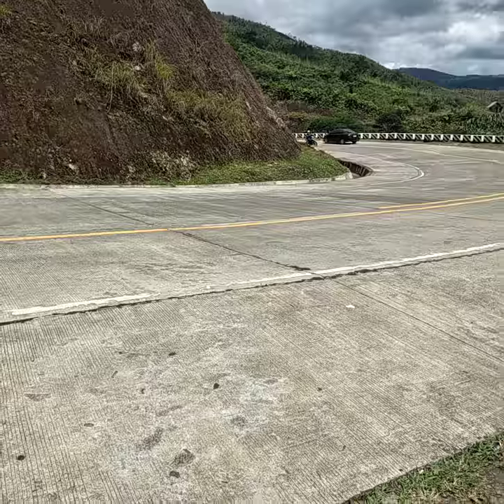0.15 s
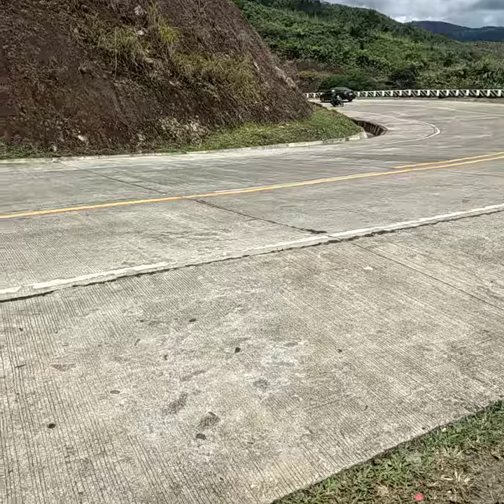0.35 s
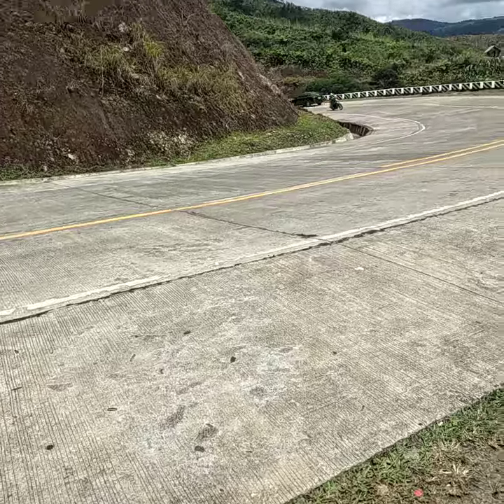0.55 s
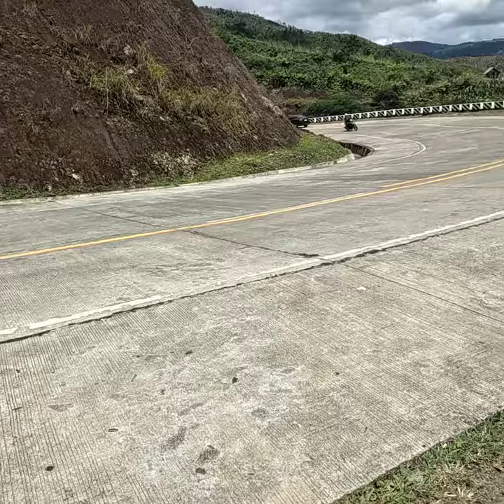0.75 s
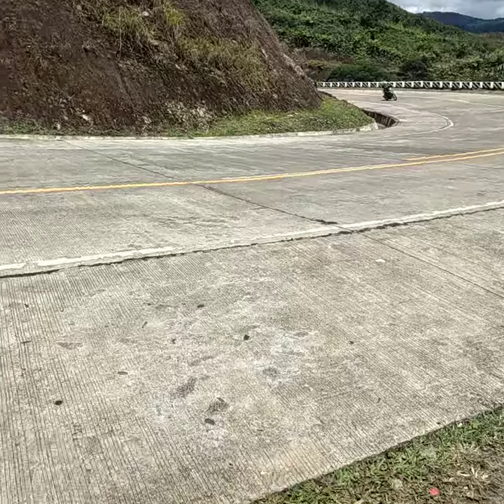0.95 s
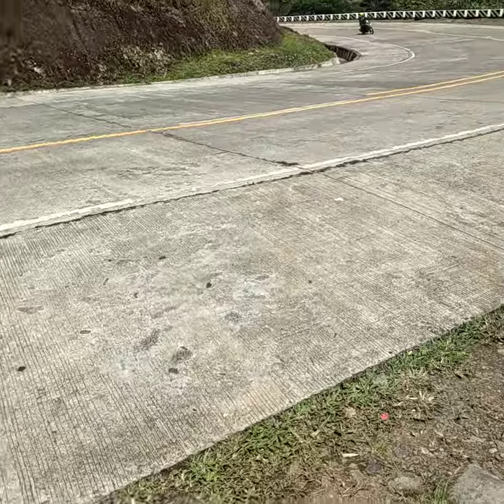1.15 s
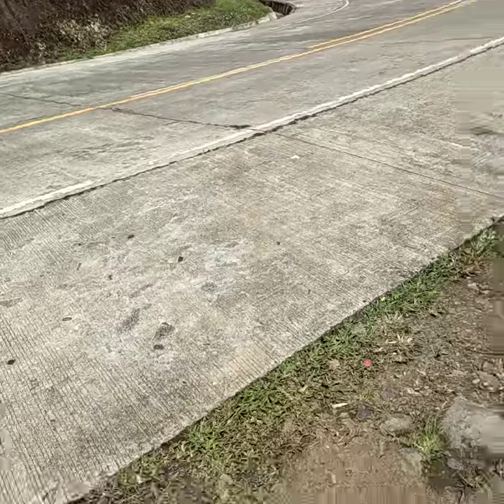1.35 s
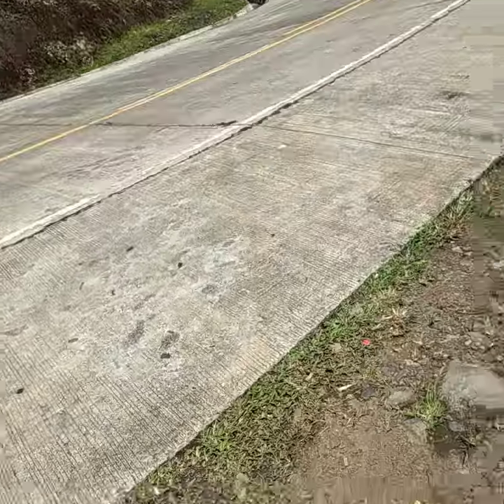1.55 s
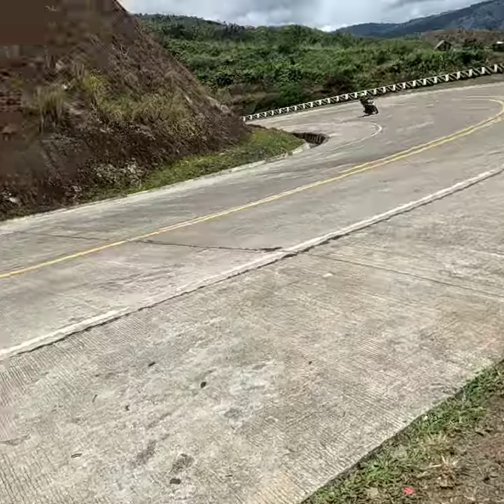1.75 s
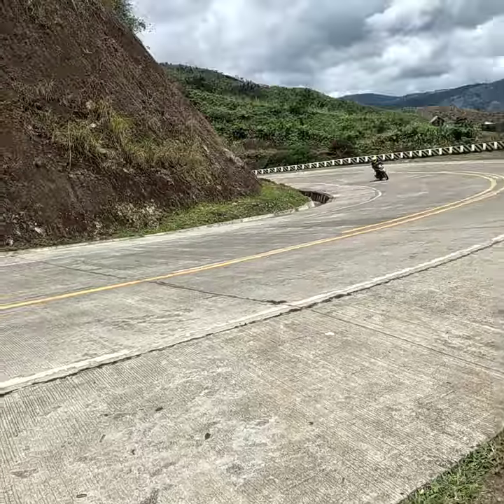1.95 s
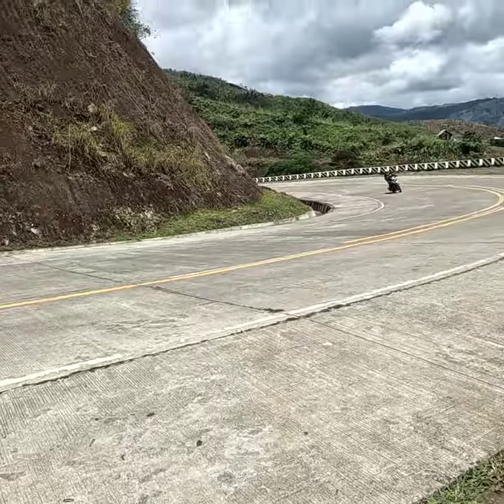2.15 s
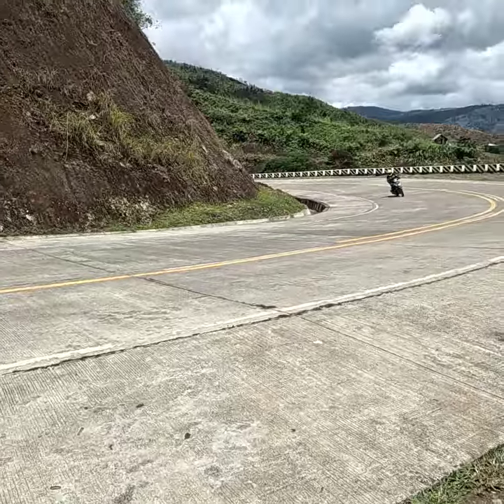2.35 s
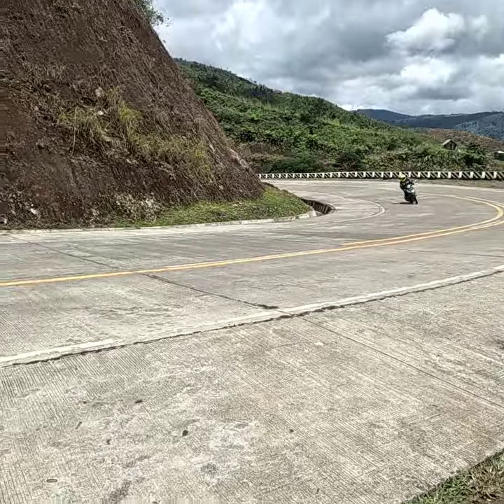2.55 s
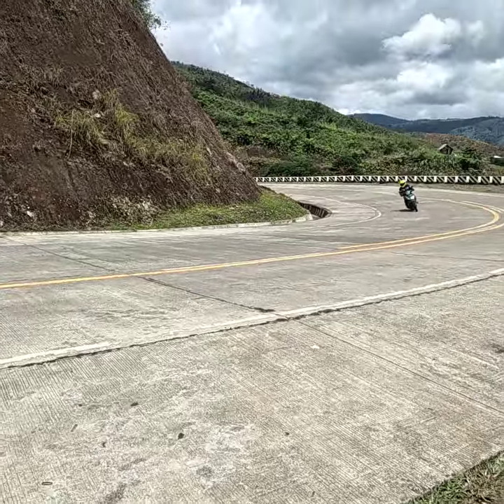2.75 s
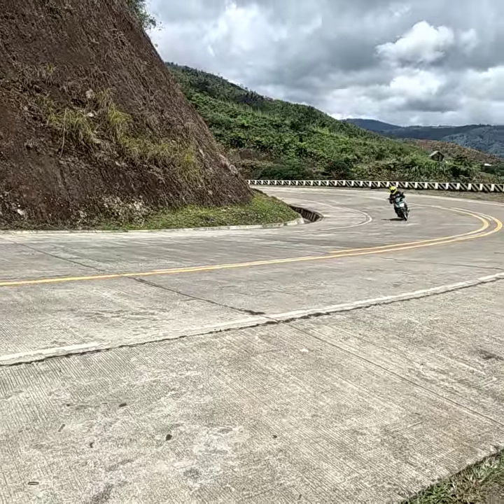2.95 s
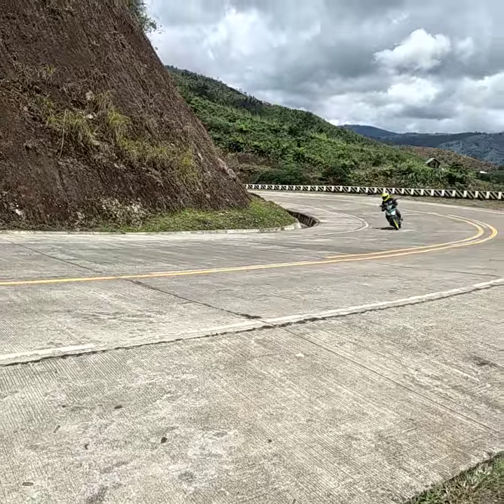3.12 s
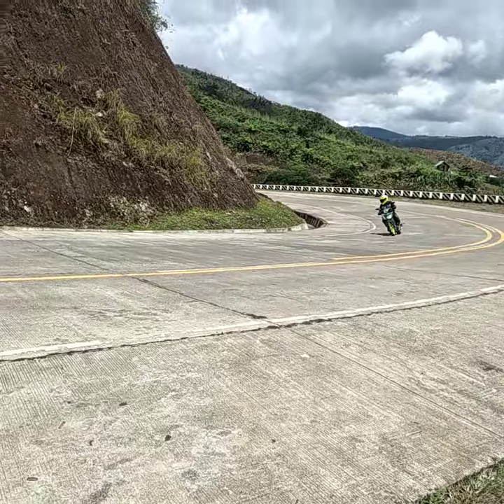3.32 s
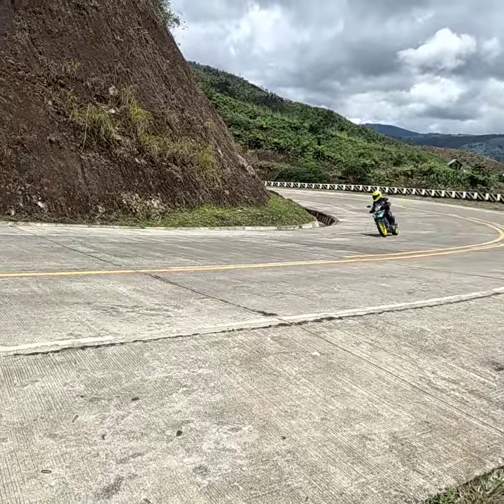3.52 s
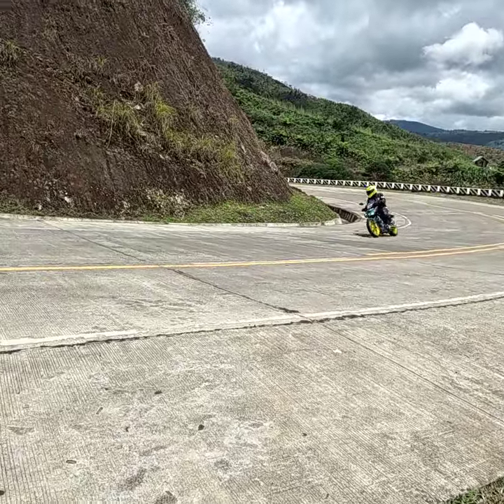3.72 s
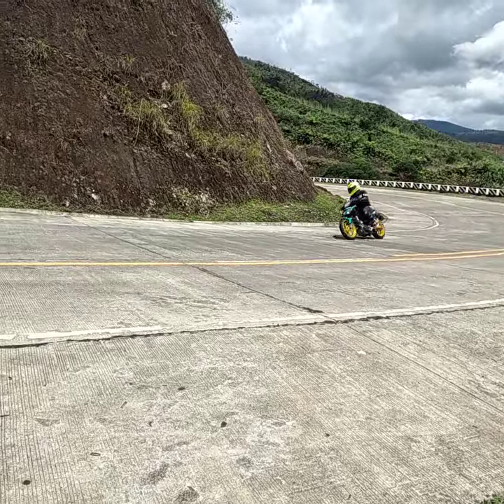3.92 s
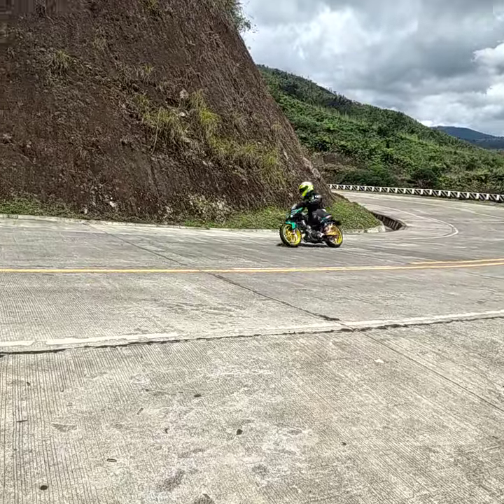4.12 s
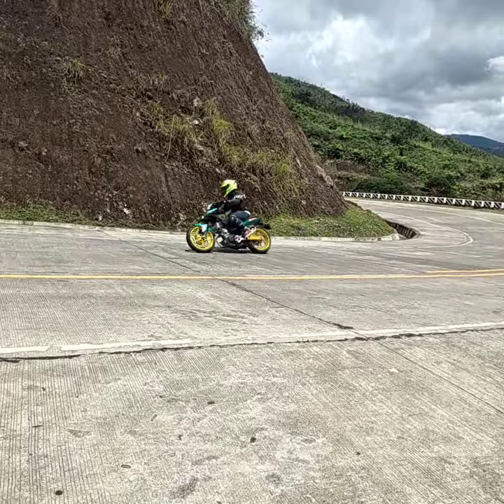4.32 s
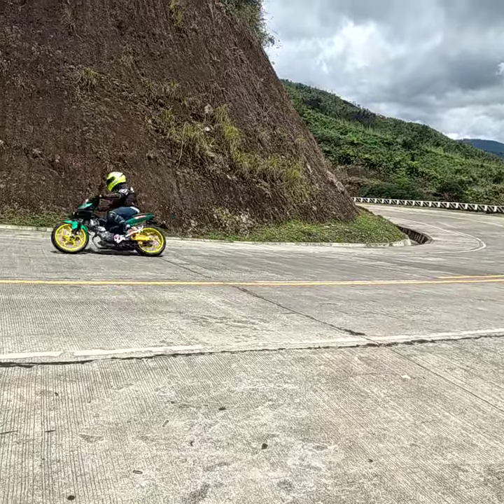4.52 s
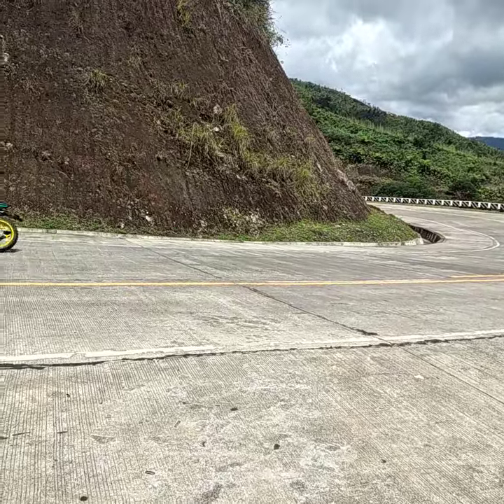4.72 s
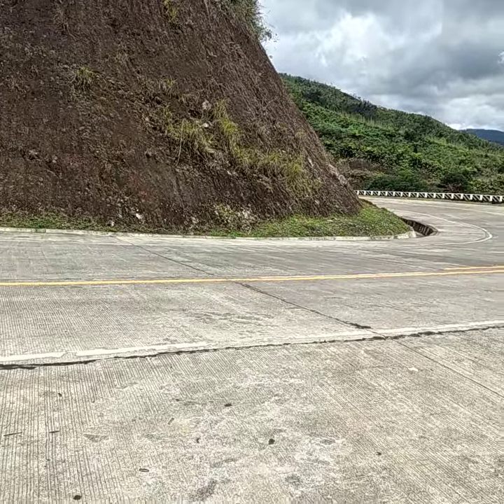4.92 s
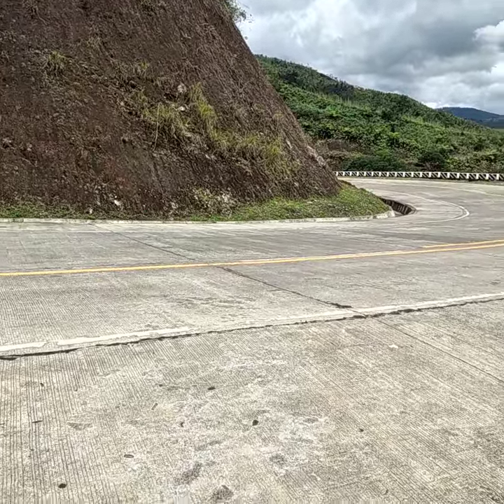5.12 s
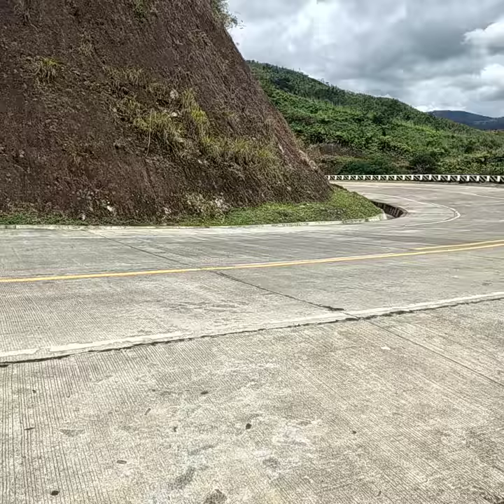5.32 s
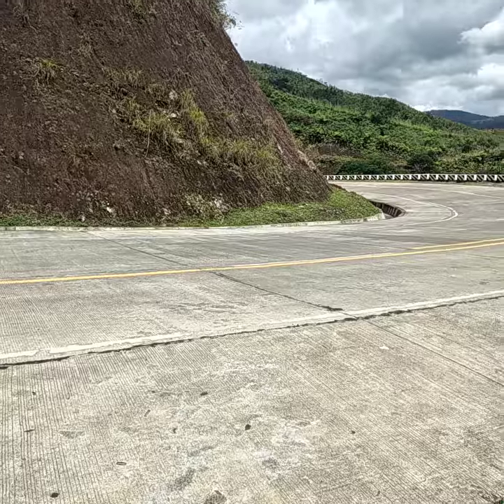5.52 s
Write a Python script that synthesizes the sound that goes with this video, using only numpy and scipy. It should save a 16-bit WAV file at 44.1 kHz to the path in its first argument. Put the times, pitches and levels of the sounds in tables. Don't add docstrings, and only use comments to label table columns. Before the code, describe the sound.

After about a third of a second of silence, a one-cylinder scooter fades in, its fast exhaust crackling sharply as it pulls away. A slow dull idle beats underneath with a soft wash off the hillside. A second scooter grows from a faint hum, opens its throttle and thumps past near five seconds, tyres hissing, chain rattling. Outdoors, handheld stereo microphone.

```python
import sys
import numpy as np
from scipy import signal
from scipy.fft import rfft, irfft, next_fast_len
from scipy.io import wavfile
from scipy.ndimage import uniform_filter1d

SR = 44100
rng = np.random.default_rng(int(sys.argv[2]) if len(sys.argv) > 2 else 0)


def ratio_of_db(decibels):
    return 10 ** (np.asarray(decibels, float) / 20)


def store_wav(level_fs):
    pcm = np.round(np.clip(np.atleast_2d(level_fs), -1, 1) * 32767)
    wavfile.write(sys.argv[1], SR, pcm.T.astype(np.int16))


N = 245637
T = np.arange(N) / SR
SOUND_CM_PER_S = 34300


def evened(x):
    return x / np.sqrt(np.mean(x ** 2) + 1e-20)


def between(ends, share):
    return ends[0] + (ends[1] - ends[0]) * share


def read(points, hz):
    f, value = np.transpose(points)
    return np.interp(np.log(hz + 1), np.log(f + 1), value)


def curves(rows):
    s, *columns = np.transpose(rows)
    return [np.interp(T, s, c) for c in columns]


def later(x, delay_ms):
    return np.interp(T - delay_ms / 1000, T, x)


def causal(points, size=8192):
    hz = abs(np.fft.fftfreq(size, 1 / SR))
    log_gain = np.log(ratio_of_db(np.maximum(read(points, hz), -100)))
    return np.fft.ifft(np.exp(np.conj(signal.hilbert(log_gain)))).real[:size // 2]


def resonate(x, hz, width):
    turn = np.exp(2j * np.pi * np.cumsum(hz * np.ones(N)) / SR)
    r = np.exp(-np.pi * width / SR)
    return 2 * (turn * signal.lfilter([1 - r], [1, -r], x / turn)).real


def firings(rate, at, jitter_ms):
    turns = np.cumsum(curves(rate)[0]) / SR - at
    places = np.flatnonzero(np.diff(np.floor(turns)) > 0)
    places = places + jitter_ms / 1000 * SR * rng.standard_normal(len(places))
    return np.clip(places, 0, N - 1).astype(int)


def blows(places, spread_db):
    train = np.zeros(N)
    luck = np.clip(rng.standard_normal(len(places)), -1.7, 1.7)
    train[np.minimum(places, N - 1)] = ratio_of_db(spread_db * luck)
    return train


def gate(places, depth, decay_ms, spread_db):
    decay = np.exp(-np.arange(1500) / SR * 1000 / decay_ms)
    puffs = signal.oaconvolve(blows(places, spread_db), decay)[:N]
    return evened(1 + depth * puffs)


def crack(places, pipe, lag_ms, tail_ms, tail_db, spread_db):
    t, out = np.arange(1200) / SR, np.zeros(N)
    train = blows(np.minimum(places + int(lag_ms / 1000 * SR), N - 1), spread_db)
    tail = ratio_of_db(tail_db) * np.exp(-t * 1000 / tail_ms)
    for hz, width, db in pipe:
        puff = signal.oaconvolve(train, tail)[:N] * rng.standard_normal(N)
        ring = ratio_of_db(db) * width / 170 * np.exp(-np.pi * width * t) * np.sin(2 * np.pi * hz * t)
        ring *= 1 - np.exp(-t / .0005)
        out -= signal.oaconvolve(train + puff, ring)[:N]
    return evened(out)


def thump(train, colour, share, delay_ms, pipe_share, pipe_ms, bark_db, bark_ms, bark_hz):
    push = signal.oaconvolve(train, causal(colour))[:N]
    size = next_fast_len(N)
    lag_s = .0011 / (1 + (420 / (np.fft.rfftfreq(size, 1 / SR) + 1)) ** 4)
    push = irfft(rfft(push, size) * np.exp(-2j * np.pi * np.cumsum(lag_s) * SR / size), size)[:N]
    low = signal.filtfilt(*signal.butter(3, 480, fs=SR), push)
    high = push - low
    bark = 0.36 * high + resonate(high, bark_hz, 176) + 0.23 * resonate(high, 780, 170)
    bark = ratio_of_db(bark_db) * (bark + 0.43 * later(bark, bark_ms))
    again = later(uniform_filter1d(low, size=70), pipe_ms)
    return (low + share * later(low, delay_ms) + pipe_share * again + bark) / np.std(low)


def pair(hz, tilt, turn):
    return ratio_of_db(read(tilt, hz) / 2) * np.exp(.5j * np.interp(hz, *np.transpose(turn)))


def ports(x, tilt, turn):
    size = next_fast_len(N)
    half = pair(np.fft.rfftfreq(size, 1 / SR), tilt, turn)
    return irfft(rfft(x, size) * np.array([half, 1 / half]), size)[:, :N]


# (f/Hz, likeness [0-1])
LIKENESS = [(30, .9), (120, .94), (250, .9), (490, .65), (1000, .72), (2000, .66), (4000, .58), (8000, .36),
            (13000, .18)]


def noise(colour, tilt, turn, patchy_db, mirror):
    frames, hz = N // 128 + 5, np.fft.rfftfreq(512, 1 / SR)
    a, b, c, d, patches = rng.standard_normal((frames, 257, 5)).T
    patches = evened(uniform_filter1d(uniform_filter1d(patches, size=8, axis=0), size=20, axis=1))
    same = np.clip(read(LIKENESS, hz), 0, 1)[:, None]
    left = a + 1j * b
    right = same * left + np.sqrt(1 - same ** 2) * (c + 1j * d)
    half = pair(hz, tilt, turn)[:, None]
    z = np.array([half * left, right / half])
    notch_hz, share = (v[np.minimum(np.arange(frames) * 128, N - 1)] for v in mirror)
    smooth = np.exp(-(hz[:, None] / 8200) ** 4)
    comb = abs(1 + share * smooth * np.exp(3j * np.pi * hz[:, None] / notch_hz))
    z *= comb * ratio_of_db(read(colour, hz)[:, None] + patchy_db * patches)
    return evened(signal.istft(z, nperseg=512, noverlap=384)[1][:, :N])


# (f/Hz, left over right level/dB)
TILT_LEFT = [(210, 0), (360, 1), (490, 2.5), (640, -3), (870, 0), (1170, 3), (2080, 4.5), (2770, 8),
             (3670, 1.5), (4800, .5), (6200, 6.5), (7900, 10), (9300, -6), (11700, -10.5), (14500, -3)]
# (f/Hz, left leads by [radians])
TURN_LEFT = [(0, .15), (330, 0), (500, -.45), (870, .25), (1500, 0), (2330, 0.1), (3190, -1.3),
             (5000, -0.0), (5860, -1.3), (11000, -16.3), (12100, -16.0), (13500, -17.5), (14500, -20.6),
             (15300, -31.8)]


def from_left(x):
    return ports(x, TILT_LEFT, TURN_LEFT)


# (t/s, extra path [cm])
HAND = [
    (.4, 10.5),
    (.77, 7.35),
    (.9, 10.3),
    (1.8, 8.4),
    (2.1, 9.6),
]


def noise_from_left(colour, patchy_db):
    mirror = 1.5 * SOUND_CM_PER_S / curves(HAND)[0], .7 * np.ones(N)
    return noise(colour, TILT_LEFT, TURN_LEFT, patchy_db, mirror)


# (f/Hz, width [Hz], level/dB)
TAILPIPE = [(1843, 282, 6.5), (2160, 205, -2.5), (1530, 200, -9), (2580, 820, -22), (4040, 130, -14),
            (7000, 4000, -8)]


def leaving_crack(places, level_db):
    shock = crack(places, TAILPIPE, lag_ms=1.9, tail_ms=2.2, tail_db=-32, spread_db=1.1)
    scatter_db, scatter_ms = -9, 1.247
    scatter = np.outer([1, -1], ratio_of_db(level_db + scatter_db) * later(shock, scatter_ms))
    return from_left(ratio_of_db(level_db) * shock) + scatter


# (f/Hz, level/dB)
THUMP_BEHIND = [(20, -51), (40, -10), (80, 0.5), (120, -2), (145, -5.5), (165, 5.5), (200, 0.5), (250, -6),
                (370, -3), (480, -18), (800, -11), (1200, -13.5), (2500, -40.5), (8000, -123)]


def leaving_thump(places):
    return thump(blows(places, 0.46), THUMP_BEHIND, share=0.082, delay_ms=6.13, pipe_share=0.051,
                 pipe_ms=12.3, bark_db=-2.5, bark_ms=4.49, bark_hz=520)


# (f/Hz, level/dB)
HISS = [(530, -71), (900, -7.5), (1350, -10), (1500, -23), (1840, 1), (2080, 7), (2490, -4), (3470, -18),
        (4010, -17), (5530, -9), (7460, -5), (10400, -9.5), (15600, -27.5)]


def leaving_hiss(places):
    ticks = gate(places + 75, depth=2.3, decay_ms=2.8, spread_db=3.5)
    return noise_from_left([(350, -55)] + HISS, 1.9) * ticks


# (pitch ratio, from t/s, to t/s, level/dB)
WHINE_PAIRS = [
    (1.0, 0.38, 0.515, -40.5),
    (1.45, 0.41, .545, -46),
]


def leaving_whine():
    whine_hz = between((1238, 648), .5 + .5 * np.tanh((T - .47) / .08))
    turn = 2 * np.pi * np.cumsum(whine_hz) / SR
    whine = np.zeros(N)
    for ratio, start, end, db in WHINE_PAIRS:
        outside_s = np.maximum(np.maximum(start - T, T - end), 0)
        whine += ratio_of_db(db - 810 * outside_s) * np.sin(ratio * turn)
    return whine


# (t/s, firings per second [Hz])
LEAVING_RATE = [(0.36, 40.35), (1.36, 40.338), (2.21, 41.305), (2.86, 41.565), (3.46, 42.482),
                (3.9, 41.909)]
# (t/s, level/dB)
LEAVING_LOSS = [(.3, 0.5), (.75, 1.5), (1.0, 0), (1.3, 0.5), (1.5, -1.5), (1.75, -0.5), (1.95, -5),
                (2.3, -7), (2.6, -4.5), (2.9, -8.5), (3.5, -10)]


def leaving():
    loss_db = curves(LEAVING_LOSS)[0]
    gone_s = np.clip(T - 3.535, 0, 2)
    aside_db = -10 * np.clip((1 - T) / 0.52, 0, 1) ** 2
    thump_db = -33 + loss_db - 13.5 * gone_s
    crack_db = -36 + 0.65 * loss_db + aside_db - 29 * gone_s
    hiss_db = -39.5 + 0.92 * loss_db - 42 * gone_s
    places = firings(LEAVING_RATE, .321, jitter_ms=.08)
    body = from_left(ratio_of_db(thump_db) * leaving_thump(places) + leaving_whine())
    return leaving_crack(places, crack_db) + body + ratio_of_db(hiss_db) * leaving_hiss(places)


# (f/Hz, level/dB)
HILLSIDE = [(12, -27), (20, 2.5), (171, -3.5), (395, -12.5), (480, -9), (991, -16), (1830, -3),
            (3570, -30.5), (5430, -23), (7580, -46), (15600, -42)]


def hillside():
    return ratio_of_db(-38.5) * noise_from_left(HILLSIDE, 2.24)


# (t/s, firings per second [Hz])
IDLE_RATE = [(0.4, 14.1), (5.57, 13.78)]
# (f/Hz, level/dB)
IDLE = [(12, -63), (28, 2), (56, 8.5), (80, 4), (115, 5), (150, -2), (220, -45), (500, -18), (2000, -63)]


def idling():
    places = firings(IDLE_RATE, .444, jitter_ms=0.85)
    beat = -signal.oaconvolve(blows(places, 1.14), causal(IDLE, size=32768))[:N]
    return ratio_of_db(-38.5) * evened(beat)


# (f/Hz, left over right level/dB)
TILT_AHEAD = [(210, 0), (360, 1.3), (490, 4), (620, -4), (870, -2.5), (1170, 1), (1550, .5), (2080, 2.5),
              (2770, 11), (4800, -.5), (6200, 5.5), (7900, 11), (9200, -8), (11700, -13.5), (14500, -6)]
# (f/Hz, left leads by [radians])
TURN_AHEAD = [(0, 0), (360, 0), (620, -.42), (870, -.08), (1170, -.24), (2150, -0.2), (4310, -3.4),
              (4820, -3.5), (5510, -7.6), (10200, -18.0), (10600, -22.0), (11500, -25.9), (13600, -26.6),
              (15300, -30.1)]


def from_ahead(x):
    return ports(x, TILT_AHEAD, TURN_AHEAD)


# (f/Hz, level/dB)
THUMP = [(20, -52), (47, -0.5), (95, 3), (145, 4), (190, -0.5), (285, 0.5), (380, -0.5), (430, -3.5),
         (480, -13.5), (650, -12.5), (850, -15.5), (1200, -27.5), (2500, -45.5), (8000, -79)]


def coming_thump(places, near, swing):
    echo = between((0.53, 0.013), near) + 0.1 * swing
    low = thump(blows(places, 0.98), THUMP, echo, delay_ms=5.47, pipe_share=0.33, pipe_ms=11.5,
                bark_db=between((-1.5, 0.75), near), bark_ms=between((7.8, 4.15), swing),
                bark_hz=between((737, 1080), swing))
    return low


# (f/Hz, width [Hz], level/dB)
SIDE_PIPE = [(1295, 520, 5.5), (1920, 780, 5), (2420, 380, 2), (3100, 2500, -22)]


def coming_bite(places):
    return crack(places, SIDE_PIPE, lag_ms=2.6, tail_ms=2.5, tail_db=-20, spread_db=2)


# (f/Hz, level/dB)
ROAR = [(590, 22), (1000, 3.5), (1130, -2.5), (1570, 7), (1780, 5), (2090, -7.5), (2290, -6.5),
        (3050, -5.5), (4210, -3), (6530, -2.5), (7850, -6.5), (10100, -1.5), (13000, -15.5), (15600, -12)]
# (t/s, level above the roar/dB)
JOINTS = [
    (4.35, 3),
    (4.445, 1.5),
    (4.86, 5),
    (5.11, 4),
    (5.35, 5),
]


def tyre_roar(places, hidden_db):
    beside = 1 / (1 + ((T - 4.6) / 0.72) ** 2)
    roar_db = -40 + 10 * np.log10(beside) - 10.5 * np.clip(4.42 - T, 0, 2)
    for s, db in JOINTS:
        roar_db = roar_db + db * np.exp(-((T - s) / .008) ** 2)
    close = np.exp(-((T - 4.95) / .4) ** 2)
    path_cm = between((9.4, 13.2), close)
    mirror = 1.525 * SOUND_CM_PER_S / path_cm, np.clip(between((.8, .12), close), 0, 1)
    hiss = noise([(480, -10.5)] + ROAR[1:], TILT_AHEAD, TURN_AHEAD, 1.27, mirror)
    return ratio_of_db(roar_db - hidden_db + 8.5) * hiss * gate(places, 0.33, 5.6, 4.4)


# (t/s, half length [s], level/dB, f/Hz)
SLAPS = [
    (4.97, .04, -32, 8050),
    (5.378, 0.19, -30.5, 7400),
]


def chain_rattle(places, swing, hidden_db):
    slaps = [ratio_of_db(db) * np.exp(-((T - s) / half) ** 2) for s, half, db, _ in SLAPS]
    slaps = np.array(slaps + [ratio_of_db(between((-56, -36.5), swing))])
    pitch = np.dot([hz for *_, hz in SLAPS], slaps[:-1]) + between((7260, 7400), swing) * slaps[-1]
    rattle_hz = pitch / slaps.sum(0)
    knocks = ratio_of_db(2.5 * rng.exponential(1, (N, 2)).T) * (rng.random((N, 2)).T < 5000 / SR)
    knocks = knocks * np.exp(2j * np.pi * rng.random((N, 2)).T)
    band = signal.lfilter(*signal.butter(2, 800, fs=SR), knocks)
    rattle = evened((band * np.exp(2j * np.pi * np.cumsum(rattle_hz) / SR)).real)
    rattle = rattle * gate(places + 150, .6, 6.5, 3.5)
    level = np.linalg.norm(slaps, axis=0) * ratio_of_db(-hidden_db - 3.5)
    return level * ratio_of_db([[1.5], [-1.5]]) * (rattle + 0.067 * rattle[::-1])


# (t/s, firings per second [Hz])
COMING_RATE = [(0.4, 45.548), (1.5, 45.496), (1.6, 45.553), (2.4, 43.223), (2.8, 43.014), (3.2, 43.381),
               (4.2, 46.472), (4.4, 46.331), (4.5, 47.022), (4.85, 47.138), (5.57, 48.63)]
# (t/s, thump level/dB, throttle [0-1])
COMING = [(.3, -43, .3), (1, -44, .3), (1.7, -47, 0.2), (2.3, -41, 0.1), (2.8, -39.5, 0.2),
          (3.5, -32, 0.23), (4.1, -28.5, 0.44), (4.4, -27, 0.45), (4.7, -25, 0.16), (4.9, -22.5, 0.46),
          (5.3, -22, 0.51), (5.57, -24.5, 0.59)]


def coming():
    thump_db, throttle = curves(COMING)
    bite_db = thump_db + between((-47, 9.6), throttle)
    near = np.clip((thump_db + 38) / 8, 0, 1)
    swing = .5 + .5 * np.tanh((T - 4.9) / 0.14)
    hidden_db = 45 * np.clip(2.9 - T, 0, 2)
    places = firings(COMING_RATE, .682, jitter_ms=.04)
    lurch_ms, lurch = .2, int(.06 * SR)
    bumps = evened(uniform_filter1d(uniform_filter1d(rng.standard_normal(N), size=lurch), size=lurch))
    places = np.clip(places + (lurch_ms / 1000 * SR * bumps[places]).astype(int), 0, N - 1)
    low = ratio_of_db(thump_db) * coming_thump(places, near, swing)
    low = low - 0.5 * swing * resonate(low, 93, 20)
    engine = low + ratio_of_db(bite_db) * coming_bite(places)
    rattle = chain_rattle(places, swing, hidden_db)
    return from_ahead(engine + rattle) + tyre_roar(places, hidden_db)


# (t/s, half length [s], level/dB, f/Hz)
TREAD = [
    (3.55, 0.58, -53.5, 4540),
    (4.296, .28, -56, 6540),
    (4.35, 0.62, -48.5, 3020),
    (5.3, 0.42, -42, 6130),
]


def tread():
    song = np.zeros(N)
    for s, half, db, hz in TREAD:
        band = resonate(resonate(rng.standard_normal(N), hz, 400), hz, 400)
        song += ratio_of_db(db) * np.exp(-((T - s) / half) ** 2) * evened(band)
    return from_ahead(song)


def scene():
    return leaving() + hillside() + idling() + coming() + tread()


def roll_off(x):
    return signal.sosfilt(signal.butter(12, 15800, fs=SR, output="sos"), x)


def record(dry):
    fade_in = np.clip((T - 0.35) / 0.28, 0, 1)
    fade_out = between((.48, 1), np.clip((T[-1] - T) / .02, 0, 1))
    return roll_off(dry * (fade_in * fade_out))


dry = scene()
out = record(dry)
store_wav(out)
```